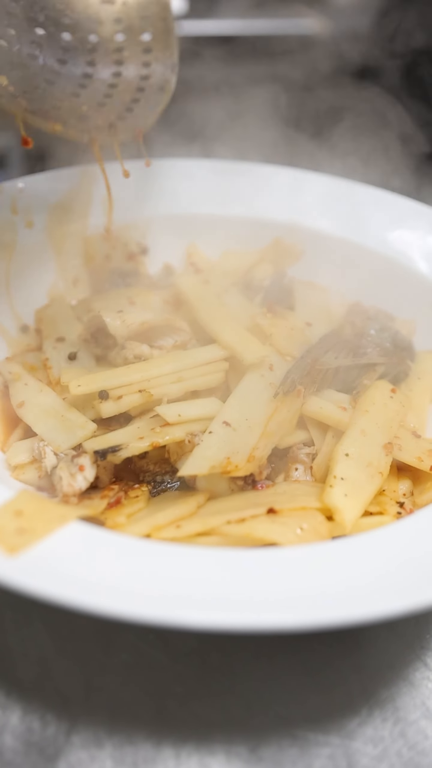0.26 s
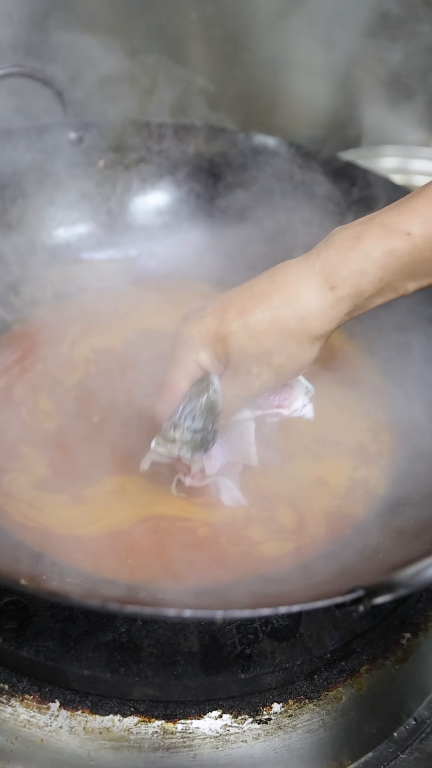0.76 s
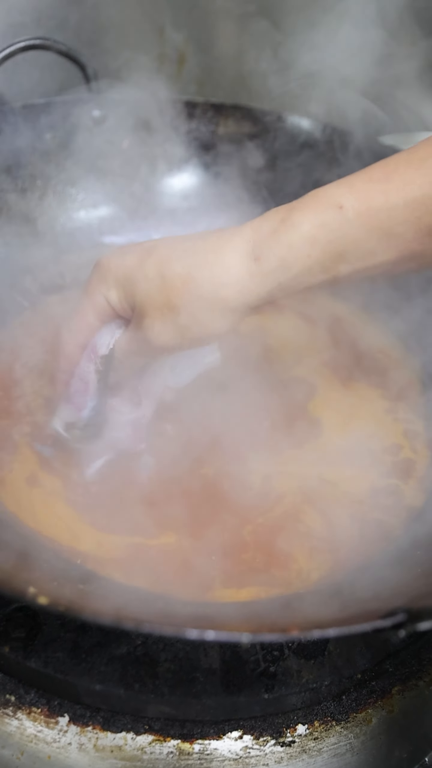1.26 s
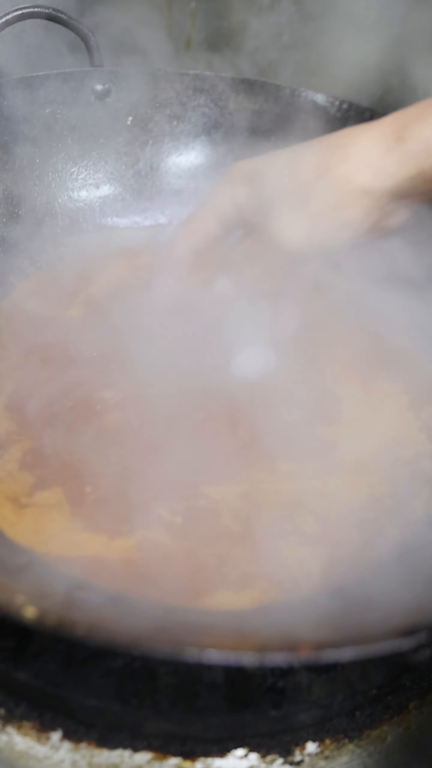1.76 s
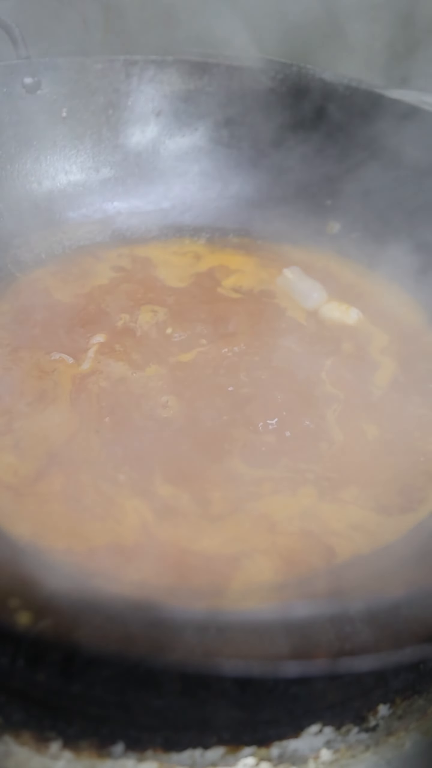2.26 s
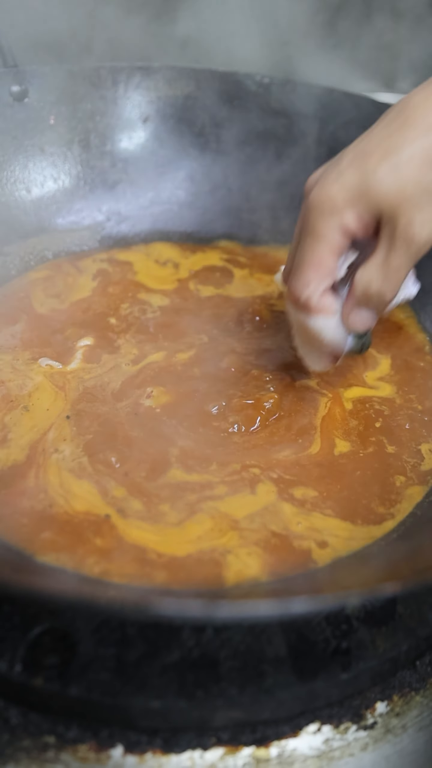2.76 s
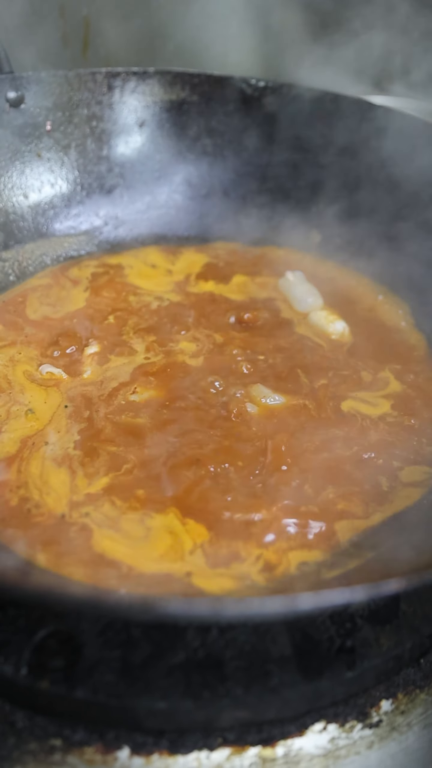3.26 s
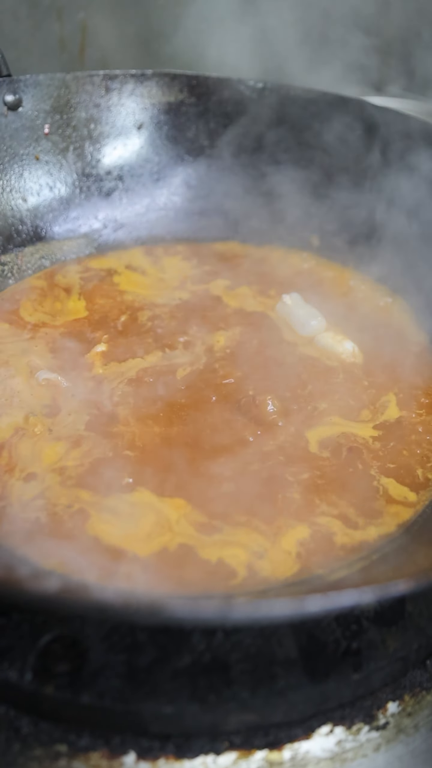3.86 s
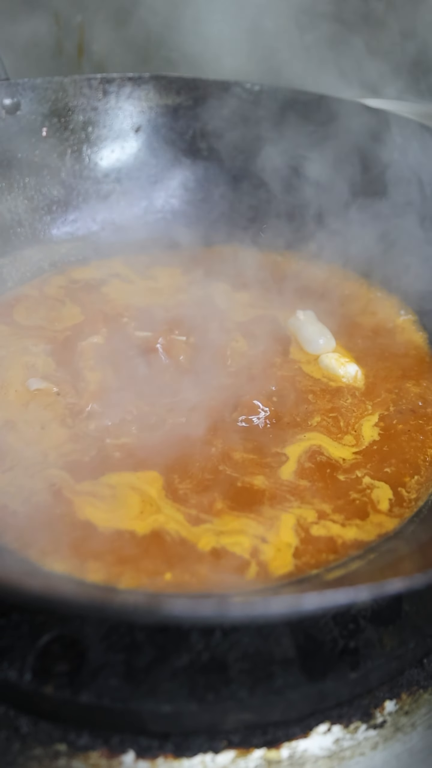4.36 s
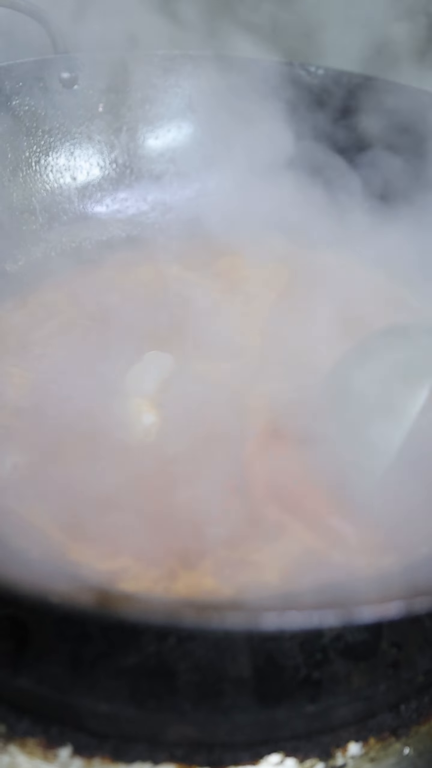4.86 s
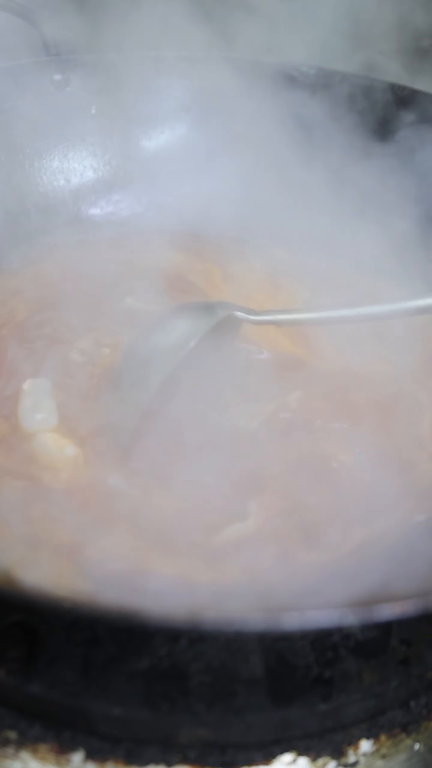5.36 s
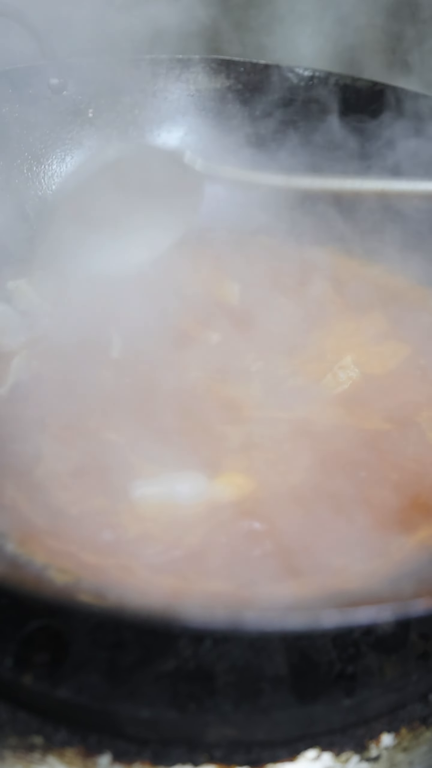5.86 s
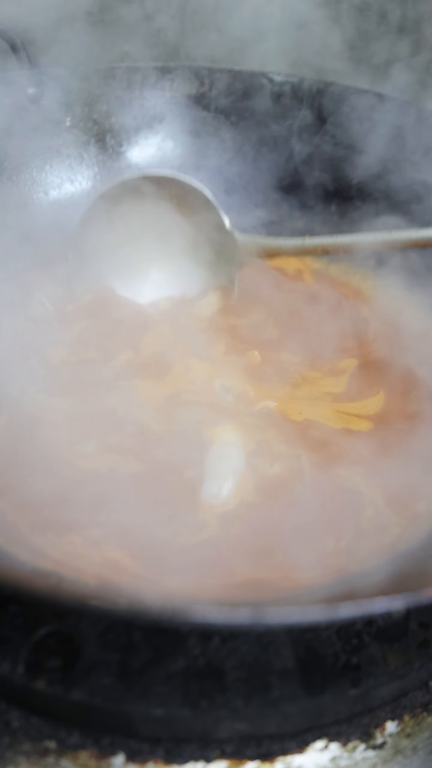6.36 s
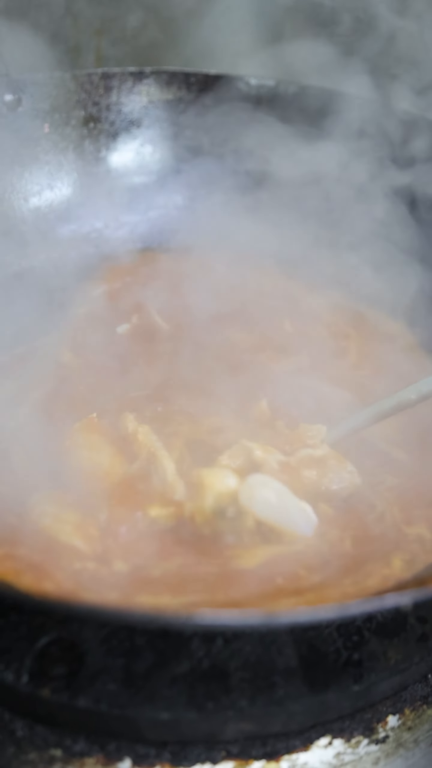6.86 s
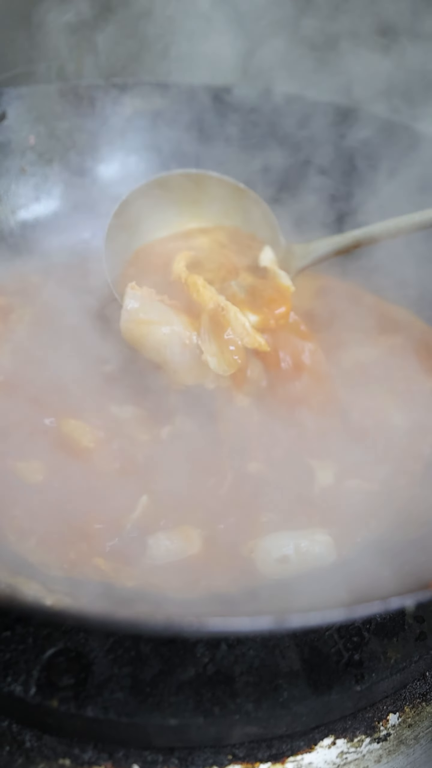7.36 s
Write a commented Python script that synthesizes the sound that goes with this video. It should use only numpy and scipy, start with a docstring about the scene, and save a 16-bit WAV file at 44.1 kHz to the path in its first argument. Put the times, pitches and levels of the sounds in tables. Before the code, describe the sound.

A gas flame flares up and booms steadily beneath a wok of broth, while rushing air whistles and the liquid briefly sizzles.

```python
"""A gas burner roars under a wok of broth, swelling to full strength within the first second.
Its turbulent flame booms in the chamber under the wok and rings the stove body, and the burner sings.
Forced air and gas rush through the ports in breathy whistles, over the deep hum of a blower.
Now and then broth washes up the hot iron and sizzles as tiny steam bubbles burst."""
import sys
import numpy as np
from scipy import signal
from scipy.fft import rfft, irfft, next_fast_len
from scipy.io import wavfile
from scipy.ndimage import uniform_filter1d

SR = 44100
rng = np.random.default_rng(int(sys.argv[2]) if len(sys.argv) > 2 else 0)


def output_pcm(signal):
    """Save a mono or channel-first signal as 16-bit PCM at the path in sys.argv[1].

    Samples are clipped to [-1, 1] before scaling.
    """
    pcm = np.clip(np.atleast_2d(signal).T, -1, 1) * 32767
    wavfile.write(sys.argv[1], SR, np.round(pcm).astype(np.int16))


N = 335597

# The flame is turned up. Each row: time in seconds, strength in dB against full heat.
HEAT = [(0, -16.5), (0.38, -17.5), (0.72, -8.5), (0.85, -1), (1.7, -1.5), (2.45, 1), (3.25, -0.3),
        (4.9, 0.5), (6.4, 0.14), (7.61, -0.1)]
# The flame flares. Each row: start in seconds, length in seconds, boom gain in dB, boom pitch in Hz.
FLARES = [(0.843, 0.018, 12, 240), (0.93, 0.018, 5, 239), (0.978, 0.014, 6, 256), (1.007, 0.024, 8.5, 245),
          (1.06, 0.04, 8.5, 242), (1.208, 0.014, 6, 219), (1.248, 0.076, 10, 235), (1.505, 0.028, 8.5, 235),
          (1.653, 0.043, 8, 236), (1.898, 0.037, 4.5, 242), (2.011, 0.037, 4.5, 247),
          (2.221, 0.024, 8, 246), (2.349, 0.033, 9.5, 241), (2.405, 0.036, 8, 238), (2.462, 0.03, 4, 239),
          (2.533, 0.027, 4.5, 235), (2.575, 0.025, 9.5, 242), (2.687, 0.05, 5, 244), (2.768, 0.024, 7, 247),
          (2.831, 0.018, 8, 232), (2.905, 0.018, 4, 232), (2.964, 0.02, 7, 243), (3.07, 0.024, 9.5, 228),
          (3.158, 0.016, 5.5, 240), (3.257, 0.014, 5, 232), (3.358, 0.03, 8, 246), (3.691, 0.021, 8, 253),
          (3.748, 0.039, 6.5, 235), (3.881, 0.025, 6.5, 249), (4.126, 0.04, 6.5, 241),
          (4.182, 0.019, 9, 230), (4.23, 0.031, 4, 243), (4.29, 0.024, 6, 242), (4.426, 0.038, 6, 238),
          (4.557, 0.044, 7, 236), (4.759, 0.021, 8, 235), (4.829, 0.016, 8, 236), (4.876, 0.038, 9, 235),
          (4.948, 0.012, 6, 235), (5.024, 0.016, 7, 234), (5.089, 0.025, 7.5, 215), (5.134, 0.014, 6, 246),
          (5.175, 0.04, 9, 235), (5.225, 0.031, 4, 234), (5.306, 0.016, 7.5, 227), (5.611, 0.035, 3.5, 240),
          (5.698, 0.025, 8.5, 240), (5.788, 0.038, 8.5, 244), (6.1, 0.032, 5, 241), (6.2, 0.02, 13.5, 237),
          (6.317, 0.022, 7, 226), (6.358, 0.03, 4, 239), (6.669, 0.02, 8, 246), (6.798, 0.028, 5, 245),
          (6.869, 0.019, 7, 241), (6.921, 0.024, 10, 237), (7.144, 0.021, 6, 240), (7.246, 0.022, 6, 227),
          (7.325, 0.022, 7.5, 241), (7.428, 0.0375, 6.5, 244)]
# Tone colours of the noise layers. Each row: frequency in Hz, relative level in dB.
BELLOW_COLOUR = [(165, -19.5), (184, -3), (205, 1.5), (222, -4), (270, -1), (310, -6.5), (390, -25)]
ROAR_COLOUR = [(165, -5.5), (200, 3), (290, 4.5), (350, 0), (432, -6), (530, -8), (595, -8), (655, -14.5),
               (750, -12.5), (870, -18.5), (1000, -19), (1400, -24), (2500, -42)]
RUMBLE_COLOUR = [(35, -25.5), (68, -7.5), (100, 0), (135, -5), (170, -5), (230, -9)]
AIR_HISS_COLOUR = [(1500, -3), (1950, 1), (2200, -2), (2400, -1.5), (2900, -7), (3250, -13), (3620, -8),
                   (4000, -18), (5000, -26)]
DRAUGHT_COLOUR = [(300, 14.5), (750, 15.5), (880, 11.5), (1020, 12.5), (1230, 8.2), (1950, 5), (2200, -1),
                  (2400, 3), (2700, 2), (2950, -0.3), (3300, -5.8), (3650, -7), (4200, -8.8), (4900, -12.4),
                  (6300, -16.7), (9000, -16.5)]
SIZZLE_COLOUR = [(1500, -11), (3000, -9), (4300, 3.5), (6000, 1), (7500, 2), (8700, 2), (10000, -6)]
# Resonances of stove body, air duct and blower. Each row: pitch in Hz, width in Hz, relative level in dB.
STOVE_MODES = [(151.62, 3.7, -12), (370.4, 6, -17), (468, 5.1, -16), (494.6, 16, -16.5), (554, 16, -20),
               (597.4, 18, -21.5)]
DUCT_MODES = [(1459, 130, -3.5), (1665, 70, -5)]
BLOWER_MODES = [(46.9, 7.5, -36.2), (102.06, 15, -41)]
# Fader rides for the rumble, the sung note and the blower. Each row: time in seconds, gain in dB.
RUMBLE_FADER = [(0, -39), (0.6, -34.5), (0.9, -30), (2.1, -30.5), (2.55, -25.3), (3.1, -27.8), (3.9, -25),
                (4.4, -27), (7.61, -26.3)]
NOTE_FADER = [(0, -47), (0.72, -42), (0.96, -27.5), (1.08, -33), (1.45, -35), (2.35, -34), (2.6, -30),
              (4.3, -31), (5.0, -33), (5.7, -30.5), (6.1, -33), (6.7, -29), (7.61, -32)]
BLOWER_FADER = [(0, 2), (0.4, 4.5), (0.8, 0), (1.6, 3.5), (2.1, 1), (2.6, 3.5), (3.3, -4), (4.0, -2.5),
                (4.35, 2), (5.2, -1.5), (7.61, -3.5)]
# The air jet between surges. Each row: time in seconds, level in dB, whistle pitch in Hz.
AIR_FLOW = [(0, -39.5, 1502), (0.4, -41, 1523), (0.95, -38.5, 1489), (1.5, -38.5, 1518), (1.9, -36, 1645),
            (2.03, -35.5, 1558), (2.25, -37, 1440), (2.95, -41, 1450), (3.2, -39, 1445), (3.5, -36.8, 1455),
            (4.0, -40.5, 1460), (4.9, -37.5, 1500), (5.25, -35.5, 1600), (5.6, -36, 1500),
            (6.1, -35.5, 1510), (7.61, -36, 1510)]
# Swells of the air jet, the gas nozzle and a thin, higher whistle.
# Each row: start in seconds, length in seconds, gain in dB.
AIR_SURGES = [(0.76, 0.07, 3), (0.92, 0.09, 3), (1.06, 0.22, 2.2), (3.72, 0.12, 3), (4.13, 0.17, 5),
              (4.52, 0.1, 5.5), (4.63, 0.1, 3.5), (4.73, 0.2, 3.5), (5.14, 0.18, 1.5), (5.53, 0.14, 4.5),
              (5.94, 0.1, 2), (6.19, 0.2, 4.5), (6.53, 0.222, 4), (6.97, 0.12, 3.7), (7.44, 0.18, 4)]
NOZZLE_SPELLS = [(-0.05, 0.433, 4.2), (0.43, 0.19, 6.5), (0.77, 0.2, 8), (0.97, 0.28, 8),
                 (1.25, 0.28, 11.8), (1.53, 0.214, 9.7), (1.75, 0.105, 13.8), (1.86, 0.2445, 10),
                 (2.11, 0.11, 12), (2.22, 0.09, 9), (2.57, 0.1, 7), (2.72, 0.24, 2), (2.96, 0.34, 4.5),
                 (3.3, 0.25, 6.5), (3.69, 0.14, 2.5), (4.2, 0.13, 9), (4.47, 0.19, 9.3), (5.2, 0.22, 6),
                 (5.42, 0.16, 7.8), (5.72, 0.21, 4.7), (6.16, 0.592, 7.3), (6.95, 0.278, 4.2),
                 (7.23, 0.195, 10.5), (7.42, 0.22, 7)]
THIN_SPELLS = [(0.72, 1.6, 9), (2.8, 0.2, 13), (3.1, 0.18, 14)]
# The nozzle's whistle creeps upward. Each row: time in seconds, pitch in Hz.
NOZZLE_PITCH = [(0, 2520), (1.5, 2515), (2.2, 2540), (3.3, 2520), (4.5, 2520), (5.5, 2535), (6.3, 2585),
                (7.61, 2565)]
# Broth washes up the iron. Each row: start in seconds, peak level in dB, seconds to fade by 20 dB.
WASHES = [(0.7, -61, 0.15), (2.165, -48, 0.14), (2.25, -49, 0.38), (2.57, -57.5, 0.3), (4.5, -60, 0.5),
          (5.3, -59, 0.5), (5.4, -49.5, 0.5), (5.47, -49.5, 1), (7.17, -53.5, 0.6)]

BOOM_DB, BELLOW_DB, ROAR_DB, DRAUGHT_DB = -18.9, -21.8, -22.6, -33.4   # base levels at full heat
ROAR_FOLLOWS, DRAUGHT_FOLLOWS = 0.31, 0.098   # dB gained for each dB of heat
BOOM_THROB_DB, BELLOW_THROB_DB = 1.4, 0.4   # random swing as the flame puffs
FLARE_EDGE_S, JET_EDGE_S, NOZZLE_EDGE_S = 0.014, 0.048, 0.08   # time to swell or fade
SAG_S, SAG_SHARE, BELLOW_SHARE = 0.018, 0.36, 0.33   # the shares are of a flare's gain in dB
NOTE_HZ, NOTE_FLUTTER_DB, DRONE_HZ, DRONE_DB = 572.5, 1.2, 371, -34.5
NOZZLE_REST_DB, SHOULDER_REST_DB, THIN_REST_DB = -50.2, -53.3, -71
AIR_HISS_DB = -11.2   # against the air jet's whistle
WASH_RISE_S, SIMMER_DB = 0.06, -62
BASS_HZ, TREBLE_HZ, CUTOFF_HZ = 32, 6543, 15700


def flame_boom(heat_db):
    """The flame puffs and flares, driving the chamber's pitched boom and the broad bellow around it."""
    puffs = drift(width_hz=33)
    flare_db = swells([(s, length, db) for s, length, db, hz in FLARES], FLARE_EDGE_S)
    # the flame sags for a moment before each flare, as unburnt gas gathers
    sag_db = swells([(s - SAG_S, SAG_S, -SAG_SHARE * db) for s, length, db, hz in FLARES], FLARE_EDGE_S)
    # the note glides from flare to flare, and gusts of flame shake it off pitch
    boom_hz, = curves([(s + length / 2, hz) for s, length, db, hz in FLARES])
    note = resonance(boom_hz, width_hz=11.6)
    gusts = from_db(-10.5) * resonance(boom_hz, width_hz=46.0)
    boom = sustained(note + gusts, span_s=0.018)
    bellow = sustained(signal.hilbert(turbulence(BELLOW_COLOUR)), span_s=0.035)
    boom_db = BOOM_DB + heat_db + flare_db + sag_db + BOOM_THROB_DB * puffs
    bellow_db = BELLOW_DB + heat_db + BELLOW_SHARE * flare_db + sag_db + BELLOW_THROB_DB * puffs
    return from_db(boom_db) * boom + from_db(bellow_db) * bellow


def flame_roar(heat_db):
    """Turbulent burning roars broadly and rings the stove body, with a low rumble underneath."""
    roar = turbulence(ROAR_COLOUR)
    stove = from_db(-1.5) * resonances(STOVE_MODES)
    rumble_db, = curves(RUMBLE_FADER)
    rumble = from_db(rumble_db) * turbulence(RUMBLE_COLOUR)
    return from_db(ROAR_DB + ROAR_FOLLOWS * heat_db) * (roar + stove) + rumble


def burner_song():
    """The burner sings a note that fades and returns; halfway through, a lower drone joins it."""
    note_db, = curves(NOTE_FADER)
    waver = 0.75 * wander(width_hz=2.2).real
    flutter_db = NOTE_FLUTTER_DB * drift(width_hz=7)
    note = from_db(note_db + flutter_db) * np.sin(2 * np.pi * NOTE_HZ * np.arange(N) / SR + waver)
    drone = sustained(resonance(DRONE_HZ, width_hz=5), span_s=0.14)
    return note + from_db(DRONE_DB) * ramp(start_s=3.6, rise_s=0.2) * drone


def draught(heat_db):
    """Air and gas rush through the ports: a wide bed of noise that lifts a little with the heat."""
    return from_db(DRAUGHT_DB + DRAUGHT_FOLLOWS * heat_db) * turbulence(DRAUGHT_COLOUR)


def air_jet():
    """A whistle slides with the airflow around two duct resonances, and a hiss surges with it."""
    flow_db, whistle_hz = curves(AIR_FLOW)
    surge_db = swells(AIR_SURGES, JET_EDGE_S)
    duct = resonances(DUCT_MODES)
    whistle = sustained(resonance(whistle_hz, width_hz=85), span_s=0.022)
    hiss = from_db(AIR_HISS_DB) * turbulence(AIR_HISS_COLOUR)
    return from_db(flow_db + surge_db) * (rms_one(whistle + duct) + hiss)


def gas_nozzle():
    """Gas breaks into a breathy whistle, whose broad upper shoulder swells less than its core."""
    spell_db = swells(NOZZLE_SPELLS, NOZZLE_EDGE_S) + 0.4 * drift(width_hz=12)
    core_hz, = curves(NOZZLE_PITCH)
    core = sustained(resonance(core_hz, width_hz=125), span_s=0.03)
    shoulder = rms_one(resonance(hz=2720, width_hz=260).real)
    shoulder_db = SHOULDER_REST_DB + 0.55 * spell_db
    return from_db(NOZZLE_REST_DB + spell_db) * core + from_db(shoulder_db) * shoulder


def thin_whistle():
    """A thin, higher whistle comes and goes as a jet catches and lets go."""
    level_db = THIN_REST_DB + swells(THIN_SPELLS, JET_EDGE_S)
    return from_db(level_db) * rms_one(resonance(hz=4160, width_hz=200).real)


def blower():
    """The blower's deep, wavering hum swells and slowly recedes."""
    swell_db, = curves(BLOWER_FADER)
    return from_db(swell_db) * resonances(BLOWER_MODES)


def sizzle(bubbles_per_s, spread_db):
    """Tiny steam bubbles of uneven size burst on the iron; each wash of broth flares and boils away."""
    t = np.arange(N) / SR
    washes = [ramp(s, WASH_RISE_S) * from_db(db - 20 * np.maximum(t - s - WASH_RISE_S, 0) / fade_s)
              for s, db, fade_s in WASHES]
    # once wetted, the rim keeps up a faint sizzle
    simmer = from_db(SIMMER_DB) * ramp(start_s=2.2, rise_s=0.5)
    level = np.sqrt(simmer ** 2 + sum(wash ** 2 for wash in washes))
    sizes = from_db(spread_db * np.minimum(rng.exponential(1, N), 5))
    signs = rng.choice([-1, 1], N)
    bursts = rng.random(N) < bubbles_per_s / SR
    return level * coloured(sizes * signs * bursts, SIZZLE_COLOUR)


def from_db(db):
    """Decibels to gain."""
    return 10 ** (np.asarray(db) / 20)


def rms_one(x):
    """Scale to an rms of 1."""
    return x / np.sqrt(np.mean(np.abs(x) ** 2) + 1e-20)


def curves(rows):
    """Join timed breakpoints into automation curves, one for each column after the time."""
    times, *columns = np.transpose(rows)
    return [np.interp(np.arange(N) / SR, times, column) for column in columns]


def ramp(start_s, rise_s):
    """A straight rise from 0 to 1."""
    return np.clip((np.arange(N) / SR - start_s) / rise_s, 0, 1)


def swells(rows, edge_s):
    """Gain in dB of events that each rise, hold and fall back."""
    return sum(db * (ramp(s - edge_s / 2, edge_s) - ramp(s + length - edge_s / 2, edge_s))
               for s, length, db in rows)


def coloured(x, colour):
    """Equalise x to a tone colour, rolling off beyond its ends; rms 1."""
    size = next_fast_len(N)
    f = np.maximum(np.arange(size // 2 + 1) * SR / size, 1)
    hz, db = np.transpose(colour)
    roll_off = np.minimum(f / hz[0], 1) ** 2 * np.minimum(hz[-1] / f, 1) ** 2
    gain = from_db(np.interp(np.log(f), np.log(hz), db))
    return rms_one(irfft(rfft(x, size) * roll_off * gain, size)[:N])


def turbulence(colour):
    """Smooth noise of a given colour; rms 1."""
    return coloured(rng.standard_normal(N), colour)


def wander(width_hz):
    """Complex amplitude that drifts at random within a bandwidth; rms 1."""
    step, run_in = 10, 4000   # samples per kick, kicks to settle
    kicks = rng.standard_normal((2, N // step + run_in + 2))
    pole = np.exp(-1.5 * np.pi * width_hz * step / SR)
    slow = signal.lfilter([1], [1, -2 * pole, pole * pole], kicks[0] + 1j * kicks[1])[run_in:]
    return rms_one(np.interp(np.arange(N) / step, np.arange(len(slow)), slow))


def drift(width_hz):
    """Slow random modulation; rms 1."""
    return rms_one(wander(width_hz).real)


def resonance(hz, width_hz):
    """A resonance shaken by turbulence: a tone of wandering strength and phase, whose centre may move."""
    return wander(width_hz) * np.exp(2j * np.pi * np.cumsum(hz * np.ones(N)) / SR)


def sustained(swing, span_s):
    """A steadily fed oscillation flutters quickly but holds its mean power; rms 1."""
    power = uniform_filter1d(np.abs(swing) ** 2, max(int(span_s * SR), 2))
    return rms_one(swing.real / np.sqrt(power + 1e-12))


def resonances(modes):
    """Several steadily fed resonances, each shaken on its own."""
    return sum(from_db(db) * sustained(resonance(hz, width), span_s=0.14) for hz, width, db in modes)


def scene():
    """Flame, jets, blower and broth, heard in mono from just above the wok."""
    heat_db, = curves(HEAT)
    burner = flame_boom(heat_db) + flame_roar(heat_db) + burner_song()
    jets = draught(heat_db) + air_jet() + gas_nozzle() + thin_whistle()
    return (burner + jets + blower() + sizzle(bubbles_per_s=9000, spread_db=1.0))[None]


def record(dry):
    """A dull microphone: peaks are rounded, the treble drops to a faint shelf, both ends are cut."""
    ceiling = 1.4
    rounded = ceiling * np.tanh(dry / ceiling)
    dull = signal.sosfilt(signal.butter(11, TREBLE_HZ, fs=SR, output="sos"), rounded)
    shelf = from_db(-30.5) * rounded
    trimmed = signal.sosfilt(signal.butter(4, BASS_HZ, "high", fs=SR, output="sos"), dull + shelf)
    return signal.sosfilt(signal.butter(12, CUTOFF_HZ, fs=SR, output="sos"), trimmed)


dry = scene()
out = record(dry)
output_pcm(out)
```